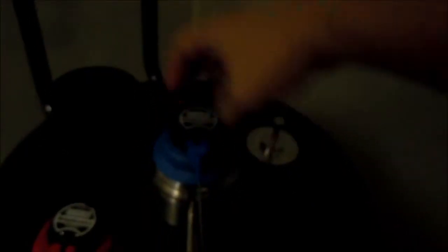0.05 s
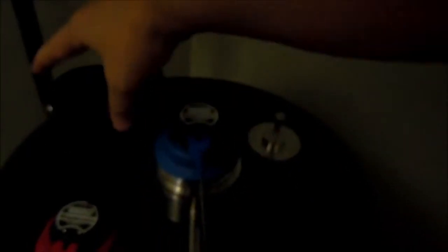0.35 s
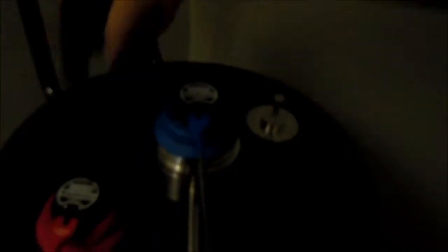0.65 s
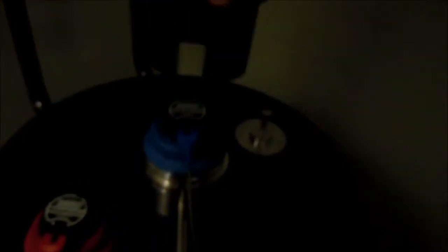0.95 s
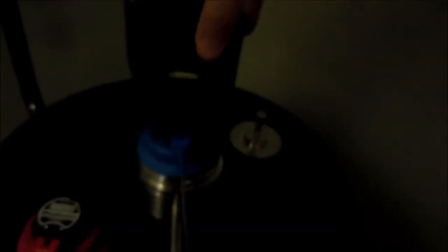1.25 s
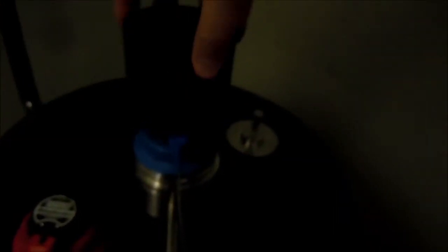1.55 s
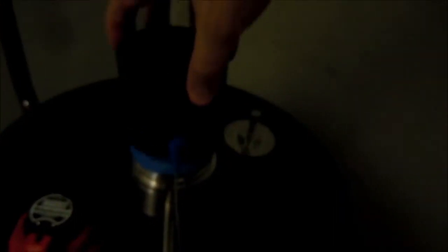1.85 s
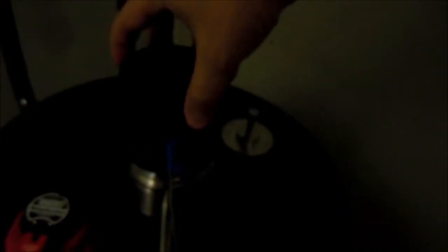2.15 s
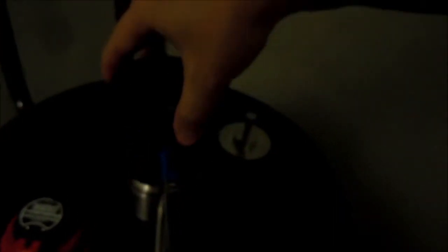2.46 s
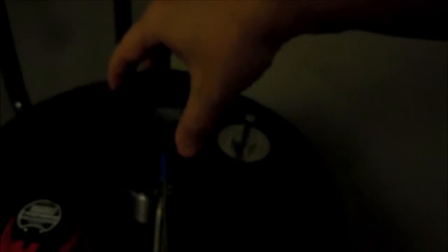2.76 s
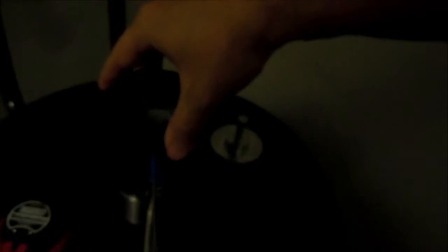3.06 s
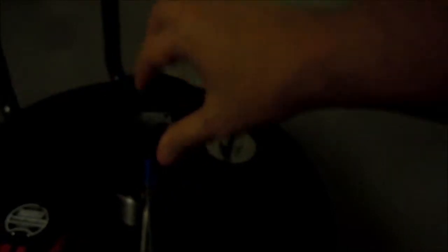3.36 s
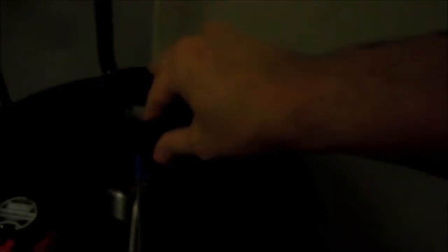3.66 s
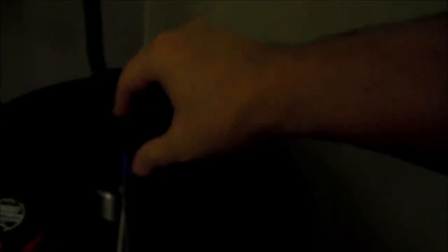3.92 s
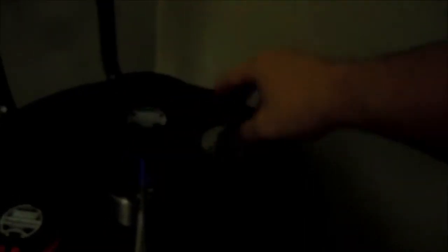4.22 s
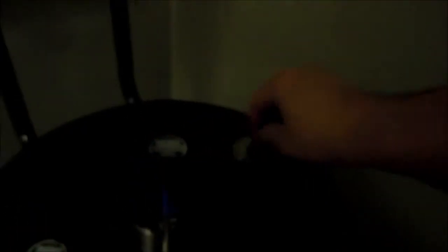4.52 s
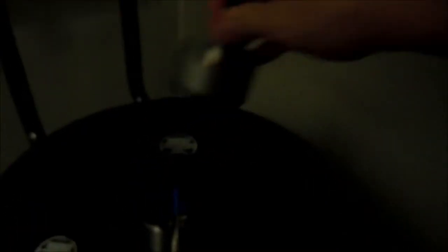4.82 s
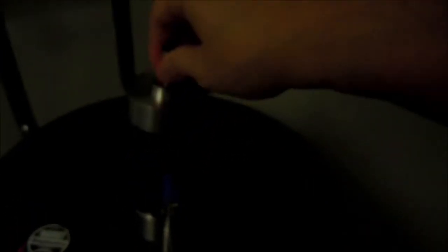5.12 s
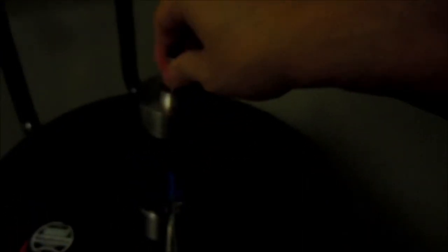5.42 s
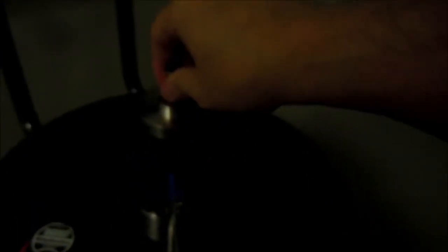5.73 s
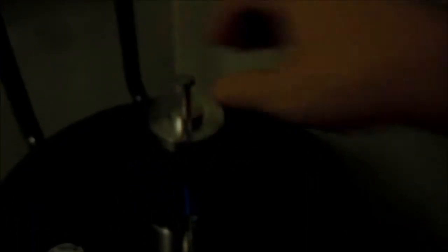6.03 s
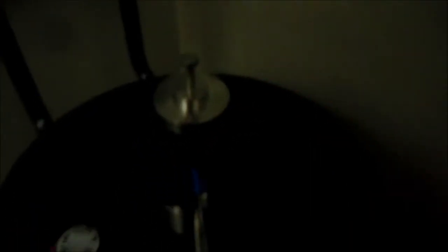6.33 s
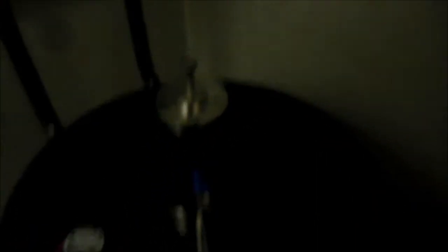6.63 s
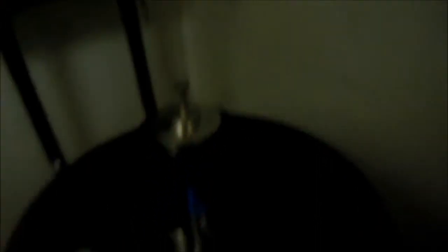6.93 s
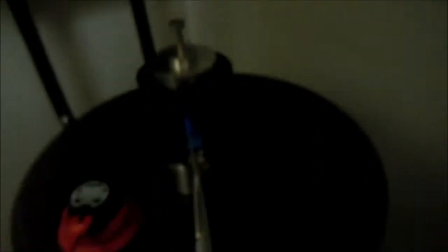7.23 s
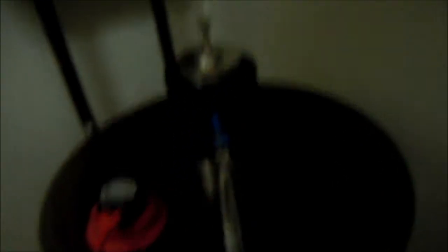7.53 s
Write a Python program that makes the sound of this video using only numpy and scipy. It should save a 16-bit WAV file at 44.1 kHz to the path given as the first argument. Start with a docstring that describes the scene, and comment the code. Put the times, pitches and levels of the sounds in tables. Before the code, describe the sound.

A quiet room is heard through a close hand-held microphone, with steady hiss, a faint high whine and slight rumble. A dull handling tap comes on the left at 0.7 seconds. From 2.4 seconds, a plastic earphone ticks against a metal coupler on the right, then seats with two hard, briefly ringing knocks at about 2.55 and 2.65 seconds, the loudest sounds. A tiny scrape joins them, the stand hums briefly, and the background dips slightly afterward. Faint plastic ticks follow between 3.3 and 4 seconds, then a very soft rub. From 5.4 to 5.7 seconds, a steel clamp clinks down, drags with a thin singing tone and settles with a bounce. From 6 seconds on, low bumps and rumble hit the microphone, mostly on the left, with soft skin rubs, light ticks and small grip creaks. A brief rub and squeak ends it near 7.7 seconds.

```python
"""Plastic ticks, two hard knocks, then clinks and short scrapes sound on the right in a quiet room.
An earphone is being seated on a metal coupler (its socket) and a steel clamp set over it: each part rings
when it is hit or dragged. The stand sways and hums; skin rubs and squeaks. A hand-held camera rumbles,
bumps, hisses and whines faintly, and its gain control turns the sound down after the hardest knock."""
import sys
import numpy as np
from scipy import signal
from scipy.fft import rfft, irfft
from scipy.io import wavfile
from scipy.ndimage import minimum_filter1d, map_coordinates

SR = 44100
rng = np.random.default_rng(int(sys.argv[2]) if len(sys.argv) > 2 else 0)


def wrap_up_sound(samples):
    """Save the sound to the file named by the first command line argument, as 16-bit audio."""
    columns = np.atleast_2d(samples).T
    # keep every value between -1 and 1, then stretch to whole-number steps
    tamed = np.clip(columns, -1, 1)
    steps = np.round(tamed * 32767).astype(np.int16)
    wavfile.write(sys.argv[1], SR, steps)


N = 338688

# modes (natural tones) of the shell, the coupler, both pressed together, and the clamp: (frequency [Hz])
SHELL_HZ = (700, 1200, 1450, 1650, 1900, 4450, 7350, 7850, 8400, 8750, 9400, 10950, 12000)
COUPLER_HZ = (700, 1250, 1707, 1958, 3120, 3320, 3516, 4175, 4860, 5100, 6380, 6530, 6720, 7400, 8845, 9220,
              9719, 10050, 10375, 12250, 12750)
PRESSED_HZ = (1720, 2040, 2870, 4110, 5130, 6630, 7110, 7370, 9290, 10300)
CLAMP_HZ = (820, 1200, 2330, 3075, 4100, 4603, 4900, 5085, 5290, 6450, 7300, 9340, 9964, 10730, 11800)
# pitches, low to high, that the point of contact boosts or softens: (frequency [Hz])
CONTACT_HZ = [1200, 3000, 5000, 6500, 10000]
# low bumps that reach the camera body: (time [s], level [dB], length of the push [s])
BUMPS = [(0.688, -19, 0.0058), (5.648, -25, 0.0033), (6.06, -17, 0.002), (6.147, -22, 0.0014),
         (6.335, -9, 0.0016), (6.584, -21.5, 0.0026), (6.699, -17.5, 0.0011), (6.722, -15, 0.009),
         (6.805, -22, 0.00067), (6.829, -11, 0.0086), (6.927, -13.5, 0.00099), (7.41, -13, 0.0012),
         (7.499, -12.5, 0.0089), (7.641, -13.5, 0.0085)]


def earphone():
    """The plastic shell is touched, knocks and chatters on the coupler, slides and drops into its seat."""
    # modes of the shell, the coupler and both pressed together: (frequency [Hz], level [dB], ring time [s])
    shell = [SHELL_HZ, (-21, -4, 4.5, -3, -12, -4, -6.5, -6, -6, -10, -2, -12, -6),
             (0.068, 0.023, 0.013, 0.013, 0.016, 0.012, 0.028, 0.018, 0.015, .016, 0.015, .012, .006)]
    coupler = [COUPLER_HZ, (-21.5, -18, -12.5, -22, -1.5, -5, -13, -16.5, -6, -19, -10, -2.5, -18, -29, -20, -13, -15, -9, -24, -18, -21),
               (.03, .022, .085, .07, .032, .03, 0.025, 0.042, 0.028, .04, .025, .038, .04, .05, 0.04, 0.034, .03, .038, 0.047, .025, .025)]
    pressed = [PRESSED_HZ, (-4, -3, -7, -4, 1, -4, 2, 3, -3, -5),
               (.05, .04, .03, 0.039, 0.029, .03, .04, .03, .022, .04)]
    # how each mode of the shell changes in a loose hold: (level change [dB])
    loose_db = (3, 6.5, -19, -14, -6, -9, 2, 8.5, -8, 0, -12, -4, -6)
    # light touches on the shell: (time [s], level [dB], treble over bass [dB], looseness [0-1])
    ticks = [(2.4012, -21, 12, 0.6), (2.447, -25, 4, 0), (2.454, -4, 2, 0), (2.5113, -9.5, 1, 0.84),
             (2.6432, -8, -18, 0.28), (2.779, -29, -1, 0), (3.28, -30, -10, 0.1), (3.626, -31, 5, 0),
             (3.696, -32, -20, 0), (3.949, -21, -7, 0), (7.0118, -24.5, 3, 0.1), (7.103, -34, 19, 0),
             (7.578, -38, 5, 0)]
    # blows on the coupler: (time [s], level [dB], ring [factor], pitch shift [%], 5 contact boosts [dB])
    knocks = [(2.5456, 0.5, 0.94, .7, -3, 4, -7.5, -4.5, 2),
              (2.55205, -7, 0.97, 1.3, -2, -18, -8, 3.5, 10.5),
              (2.6431, 1, 0.53, 1.5, -14, -6.5, 11.5, 8.5, 1)]
    out = blows(knocks, coupler, crack_db=-26, crack_t60=0.074, flat_percent=2.06)
    hz, mode_db, t60 = np.array(shell, float)
    for s, db, treble_db, loose in ticks:
        contact = [(1500, -treble_db / 2), (8000, treble_db / 2)]
        held = [hz, mode_db + loose * np.array(loose_db), t60]
        tick = strike(held, ring=0.7, crack_db=-11.0 - 4.1 * loose, crack_t60=0.033, contact=contact)
        add(out, s, undb(db) * tick / 2)
    chatter = scrape(coupler, (-13, -9, 3, 4, 9), start=2.5465, length=0.022, db=-21, fade_db=-10,
                     grit_db=-4.0, grit_top_hz=12600, ring=0.36, rise_percent=2.6)
    slide = scrape(pressed, (0, 0, 0, 0, 0), start=2.564, length=0.073, db=-36.5, fade_db=3,
                   grit_db=-2.5, grit_top_hz=11000, ring=.8, rise_percent=4.2)
    settle = scrape(shell, (-2, -12, -7, -9, 0), start=2.648, length=0.024, db=-39, fade_db=-5,
                    grit_db=-2, grit_top_hz=10000, ring=0.45)
    return out + chatter + slide + settle


def clamp():
    """The steel clamp touches down, drags with a thin singing tone and settles with a bounce."""
    # modes of the clamp: (frequency [Hz], level [dB], ring time [s])
    steel = [CLAMP_HZ, (-13.5, -20.5, -22.5, -8.5, -8, -14, 5, -2.5, -9, -18, -22, -22, -13.5, -32, -18),
             (0.014, 0.018, 0.034, 0.023, 0.011, 0.018, 0.012, 0.04, .022, 0.069, .02, .04, 0.055, 0.035, 0.036)]
    # blows on the clamp: (time [s], level [dB], ring [factor], pitch shift [%], 5 contact boosts [dB])
    hits = [(5.384, -11.5, 0.86, 0.4, 8, -6, 4.5, -0.5, -2), (5.4983, -8.5, 0.32, -5, -4, -1, 2, 0, -16),
            (5.5003, -20.5, 1.44, -.4, 6, 11.5, -1, -3, -4), (5.5452, -22, 1, 0.5, 5, 9, 5, -1, -12),
            (5.5522, -22.5, 0.75, -0.5, 10, 9, 3, -3, -6),
            (5.6085, -26, 0.31, -4, 28, -11, -2.3, -4.5, -11),
            (5.6402, -11, 0.79, 0.4, 10.5, 9.5, -0.5, 8.5, -7),
            (5.6478, -12.5, 0.8, 2.2, 10.5, 4.5, 2.5, 2, -11)]
    # modes that sing as it drags: (frequency [Hz], level [dB])
    singing = [(5085, -31), (9945, -45), (11800, -40.5)]
    clinks = blows(hits, steel, crack_db=-16, crack_t60=0.053, flat_percent=0.84)
    drag = scrape(steel, (7, 0, 0, 2, -7), start=5.54, length=0.068, db=-35, fade_db=-13,
                  grit_db=-24, grit_top_hz=8800, ring=0.63, rise_percent=-2)
    tone = sing(singing, start=5.543, length=0.064, fade_db=-8.5, flutter_db=3.5, waver_hz=26)
    return clinks + drag + tone


def blows(hits, modes, crack_db, crack_t60, flat_percent):
    """A series of blows on one metal body; the way it is held shifts its pitch a little."""
    out = np.zeros(N)
    hz, mode_db, t60 = np.array(modes, float)
    for s, db, ring, shift, *boosts_db in hits:
        held = [hz * (1 + shift / 100), mode_db, t60]
        contact = list(zip(CONTACT_HZ, boosts_db))
        add(out, s, undb(db) * strike(held, ring, crack_db, crack_t60, contact, flat_percent))
    return out


def strike(modes, ring, crack_db, crack_t60, contact, flat_percent=0, rise_s=0.001, firm_s=0.0062):
    """One blow makes a short crack and sets the body's modes ringing; ring scales both fade times."""
    # tone colour of the crack: (frequency [Hz], level [dB])
    crack_shape = [(300, -32), (900, 1), (1300, 0.5), (4500, 1.5), (8000, -3.5), (12000, -10), (14000, -23)]
    t = np.arange(SR // 5) / SR
    hz, db, t60 = np.array(modes, float)[:, :, None]
    # the pitch starts flat_percent low and rises as the contact firms
    cycles = hz * (t - flat_percent / 100 * firm_s * (1 - np.exp(-t / firm_s)))
    tones = undb(db) * contour(hz, contact) * np.sin(2 * np.pi * cycles) * decay(t, t60 * ring)
    crack = unit(colour(rng.standard_normal(len(t)), crack_shape)) * decay(t, crack_t60 * ring)
    onset = 1 - np.exp(-(t / rise_s) ** 2)
    return (tones.sum(0) + undb(crack_db) * crack) * onset


def scrape(modes, boosts_db, start, length, db, fade_db, grit_db, grit_top_hz, ring, rise_percent=0):
    """Sliding is many tiny hits: they hiss and keep a body ringing, and pressure can bend its pitch."""
    size, n = SR // 4, int(length * SR)
    grains = rng.standard_normal(size) * np.exp(0.38 * walk(430, size))
    slide = grains[:n] * undb(np.linspace(0, fade_db, n))
    one_hit = strike(modes, ring, crack_db=-26, crack_t60=.015, contact=list(zip(CONTACT_HZ, boosts_db)))
    ringing = signal.fftconvolve(slide, one_hit)
    pressure = np.minimum(np.arange(len(ringing)) / n, 1) - .5 + 0.24 * walk(110, len(ringing))
    speed = 1 + rise_percent / 100 * pressure
    bent = map_coordinates(ringing, [np.cumsum(speed)])  # read faster for a higher pitch
    out = np.zeros(N)
    add(out, start, bent / bent[:n].std())
    add(out, start, undb(grit_db) * unit(band(slide, 1100, grit_top_hz)))
    return undb(db) * out


def sing(modes, start, length, fade_db, flutter_db, waver_hz):
    """Quick sticking and slipping drives a few modes: thin tones that flutter and waver together."""
    t = np.arange(SR // 4) / SR
    swell = np.interp(t, [0, .008, length, length + .02], [0, 1, 1, 0])
    level = swell * undb(fade_db * t / length + flutter_db * walk(200, len(t)))
    drift = waver_hz * walk(150, len(t))
    out = np.zeros(N)
    for hz, db in modes:
        phase = 2 * np.pi * np.cumsum(hz + drift * hz / modes[0][0]) / SR
        add(out, start, undb(db) * level * np.sin(phase))
    return out


def squeak():
    """Skin sticks and slips in a brief squeak under the last rub."""
    # modes that squeak: (frequency [Hz], level [dB])
    modes = [(4830, -38), (8440, -32)]
    return sing(modes, start=7.661, length=.03, fade_db=5, flutter_db=-1.0, waver_hz=14)


def stand():
    """Pressing on the coupler sets its stand swaying with a brief hum, mostly on the right."""
    # pushes on the stand: (time [s], level [dB], ring time [s])
    pushes = [(2.474, -33, .2), (2.496, -28, 0.15), (2.658, -29, 0.27)]
    # low modes of the stand: (frequency [Hz], level [dB])
    modes = [(54, 0), (98, -8)]
    out, t = np.zeros(N), np.arange(SR // 3) / SR
    hum = sum(undb(db) * np.sin(2 * np.pi * hz * t) for hz, db in modes) * (1 - np.exp(-t / .004))
    for s, db, t60 in pushes:
        add(out, s, undb(db) * hum * decay(t, t60))
    return place(out, -4, 3)


def rubs(slips_per_s=670, rasp_width_hz=450):
    """Skin brushes the parts: a grainy swish, a lower rustle, and tiny slips that ring what they catch."""
    # tone colour of sliding skin: (frequency [Hz], level [dB])
    skin_shape = [(2000, -19), (3600, -3.5), (4900, 5.5), (6000, 3), (7300, 6.5), (8500, 9.5), (10000, 5),
                  (12000, -3), (15000, -34)]
    # skin and sleeve strokes: (middle [s], length [s], level [dB], rustle [dB], rasp [Hz], rasp [dB])
    strokes = [(.5, 0.7, -60, -14, 4000, -20), (4.304, 0.33, -55, -6, 5670, -3),
               (6.438, 0.067, -58.5, 9, 1480, 11.5), (6.64, 0.53, -49.5, -5, 3960, -6),
               (6.63, 0.11, -54.5, -4, 1920, 3), (6.76, 0.097, -65, -6, 4100, 3),
               (7.011, 0.29, -52.5, -1, 2010, -12), (7.2, 0.11, -39, -2, 1350, -6),
               (7.545, 0.36, -49.5, -4, 4000, -12), (7.674, 0.084, -35, -23, 4850, -8)]
    t = np.arange(N) / SR
    swish = unit(colour(rng.standard_normal(N), skin_shape) * undb(2 * walk(250) + 0.9 * walk(40)))
    rustle = unit(band(rng.standard_normal(N), 1040, 2900) * undb(2.8 * walk(180) + 0.92 * walk(30)))
    slips = (rng.random(N) < slips_per_s / SR) * rng.standard_normal(N)
    out = np.zeros(N)
    for s, length, db, rustle_db, rasp_hz, rasp_db in strokes:
        swell = np.maximum(1 - (2 * (t - s) / length) ** 2, 0) ** 0.8
        rasp = unit(band(slips, rasp_hz - rasp_width_hz / 2, rasp_hz + rasp_width_hz / 2, order=1))
        out += undb(db) * swell * (swish + undb(rustle_db) * rustle + undb(rasp_db) * rasp)
    return place(out, -28, 0)


def camera_body():
    """The holding hand rumbles, bumps, taps and creaks through the case, mostly on the left."""
    # tone colour of the rumble: (frequency [Hz], level [dB])
    rumble_shape = [(10, -13), (28, 2), (45, -6), (65, -7.5), (100, -21), (200, -27.5), (400, -34.5),
                    (1500, -66)]
    # sharp taps on the case: (time [s], left level [dB], right level [dB], treble limit [Hz])
    case_taps = [(.7392, -20.5, -42, 1700), (7.0107, -38, -18, 1100)]
    # creaks of the grip: (time [s], level [dB])
    grip_creaks = [(7.312, -31), (7.3392, -25)]
    common, extra = (unit(colour(rng.standard_normal(N), rumble_shape)) for _ in range(2))
    rumble = (place(common, 4.8, -8) + place(extra, -17.5, -19.5)) * grip()
    bumps, creaks, taps = np.zeros(N), np.zeros(N), np.zeros((2, N))
    age = np.arange(SR // 10) / SR
    for s, db, push in BUMPS:
        add(bumps, s - 2 * push, undb(db) * (age / push) ** 2 * np.exp(2 - 2 * age / push))
    for s, left_db, right_db, top_hz in case_taps:
        tap = band(-np.exp(-age / 0.0011), 120, top_hz)
        add(taps[0], s, undb(left_db) * tap)
        add(taps[1], s, undb(right_db) * tap)
    for s, db in grip_creaks:
        add(creaks, s, undb(db) * rng.standard_normal(len(age)) * np.exp(-age / 0.0025))
    bumps = place(band(bumps, 21.6, 580, order=3), 2.4, -22.0)
    creaks = place(band(creaks, 2280, 3070), 12.0, -2.4)
    return rumble + taps + bumps + creaks


def grip(still_db=-38.5, swing_db=5, wobble_db=-1.17, shake_db=-17, shake_s=0.017):
    """Strength of the rumble: low in a still hand, higher as the camera swings, shaken up by each bump."""
    t = np.arange(N) / SR
    swing = np.clip((t - 5.45) / 0.88, 0, 1)  # starts at 5.45 s, takes 0.88 s to reach full speed
    power = undb(still_db + swing_db * swing + wobble_db * walk(2.08)) ** 2
    age = t[:SR] / shake_s
    for s, db, _ in BUMPS:
        add(power, s, (undb(db + shake_db) * age * np.exp(1 - age)) ** 2)
    return np.sqrt(power)


def background(whine_hz=12857):
    """Room noise and microphone hiss with a few resonances, under a thin wavering whine."""
    # tone colour of the room noise: (frequency [Hz], level [dB per Hz])
    room_shape = [(20, -76), (100, -67.5), (200, -74.5), (450, -80), (1000, -85.5), (2000, -92),
                  (5000, -95.5), (9000, -97.5), (12500, -99.5), (14200, -106)]
    # resonances in the hiss: (frequency [Hz], width [Hz], left [dB per Hz], right [dB per Hz])
    hiss_peaks = [(647, 125, -77.5, -99), (1750, 930, -86.5, -105), (2502, 282, -73.5, -118),
                  (2645, 152, -72.5, -85), (2938, 300, -71, -92.5), (3144, 110, -75, -96),
                  (3500, 870, -88.5, -110), (4640, 1040, -93, -105)]
    hz = np.fft.rfftfreq(N, 1 / SR)
    white = rng.standard_normal((3, N)) * np.sqrt(SR / 2)
    power = sum(place(1 / (1 + (2 * (hz - centre) / width) ** 4), left_db, right_db) ** 2
                for centre, width, left_db, right_db in hiss_peaks)
    hiss = irfft(rfft(white[2]) * np.sqrt(power), N)
    phase = 2 * np.pi * np.cumsum(whine_hz + 6 * walk(60)) / SR
    whine = np.sqrt(2) * place(np.sin([phase, phase + 2.57]), -57.5, -53)
    return colour(white[:2], room_shape) + hiss + whine


def microphones(x, lag_s=.00004, room_db=-34, room_t60=0.2):
    """The right side faces the work; the left hears it later and duller. The room adds a faint echo."""
    # what reaches the left side: (frequency [Hz], level [dB])
    shade = [(500, 0.5), (1300, -35), (2700, -2.5), (3300, -16.5), (5000, -9.0), (6300, -28.0),
             (9000, -44)]
    t = np.arange(SR // 3) / SR
    tail = rng.standard_normal((2, len(t))) * decay(t, room_t60)
    tail /= np.sqrt(np.sum(tail ** 2, axis=1, keepdims=True))
    left = np.roll(colour(x, shade), round(lag_s * SR))
    direct = np.array([left, x])
    return direct + undb(room_db) * signal.fftconvolve(direct, tail, axes=1)[:, :N]


def gain_control(x, threshold_db=-5.5, depth_db=4.5, hold_s=0.45, recovery_db_per_s=5.0, attack_s=0.026):
    """Loud peaks pull the volume down; it waits, then creeps back."""
    over_db = np.clip(20 * np.log10(np.abs(x).max(0) + 1e-9) - threshold_db, 0, depth_db)
    ramp = recovery_db_per_s * np.arange(N) / SR
    cut_db = np.maximum.accumulate(over_db + ramp) - ramp
    half = int(hold_s * SR / 2)
    held_db = -minimum_filter1d(-cut_db, 2 * half + 1, origin=half, mode="nearest")
    smoothing = np.exp(-1 / (attack_s * SR))
    return x * undb(-signal.lfilter([1 - smoothing], [1, -smoothing], held_db))


def undb(db):
    """Turn decibels into a volume factor."""
    return 10 ** (np.asarray(db) / 20)


def unit(x):
    """Scale to an average (rms) level of 1."""
    return x / np.sqrt(np.mean(x ** 2))


def decay(t, t60):
    """Fade by 60 dB in t60 seconds, the ring time."""
    return np.exp(-np.log(1000) * t / t60)


def contour(hz, points):
    """Volume factors at hz along an outline of (frequency [Hz], level [dB])."""
    at, db = np.transpose(points)
    return undb(np.interp(np.log(hz + 1), np.log(at), db))


def colour(x, points):
    """Shape a sound's lows and highs to an outline."""
    hz = np.fft.rfftfreq(x.shape[-1], 1 / SR)
    return irfft(rfft(x) * contour(hz, points), x.shape[-1])


def band(x, lo_hz, hi_hz, order=2):
    """Keep the sound between two frequencies."""
    edges = [lo_hz, min(hi_hz, SR / 2 - 100)]
    return signal.sosfilt(signal.butter(order, edges, "band", fs=SR, output="sos"), x)


def walk(rate, size=N):
    """A random wander, roughly 1 either way, with rate steps a second."""
    at = np.arange(size) / SR * rate
    knots = rng.standard_normal(size // 20)
    return np.interp(at, np.arange(len(knots)), knots)


def add(track, s, sound):
    """Mix a sound in at s seconds."""
    i = int(s * SR)
    track[i:i + len(sound)] += sound[:max(N - i, 0)]


def place(x, left_db, right_db):
    """Set a sound's left and right levels."""
    return undb([[left_db], [right_db]]) * x


def scene():
    """Handling sounds over the steady background."""
    return microphones(squeak() + earphone() + clamp()) + stand() + rubs() + camera_body() + background()


def record(dry):
    """The gain control acts, the hardest knock overloads, and the highest treble is cut."""
    overloaded = np.clip(gain_control(dry), -.88, .88)
    treble_cut = signal.ellip(8, .05, 70, 14600, fs=SR, output="sos")
    return signal.sosfiltfilt(treble_cut, overloaded)


dry = scene()
out = record(dry)
wrap_up_sound(out)
```